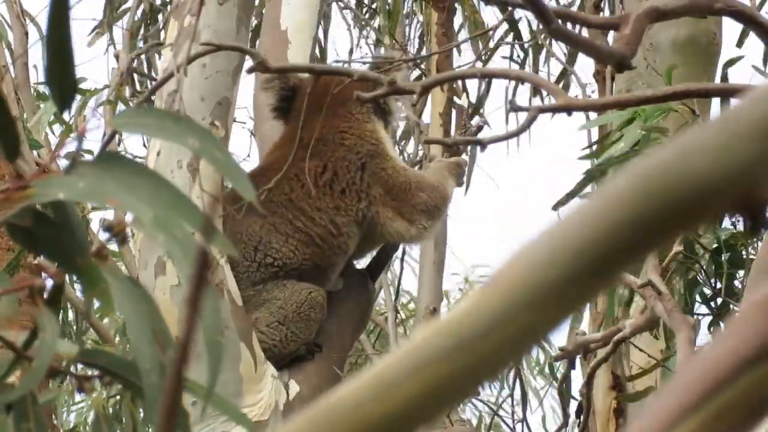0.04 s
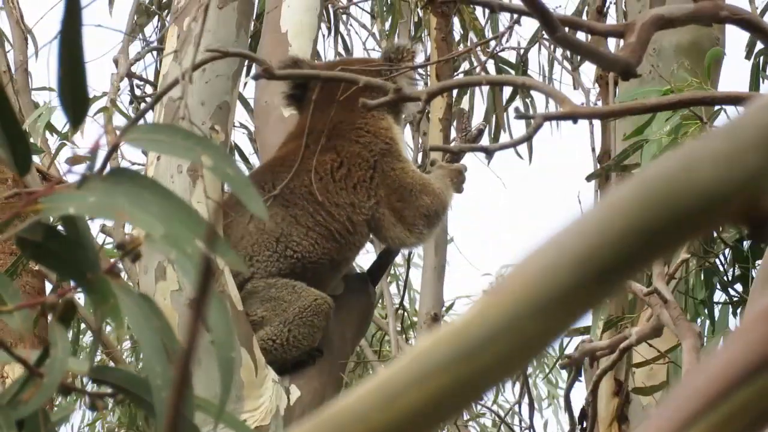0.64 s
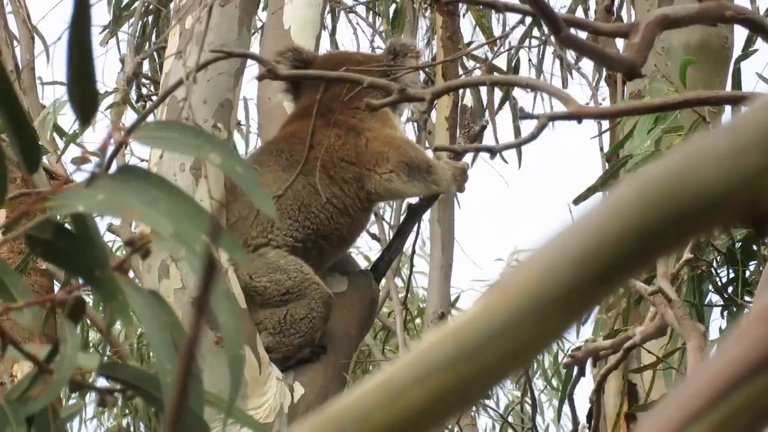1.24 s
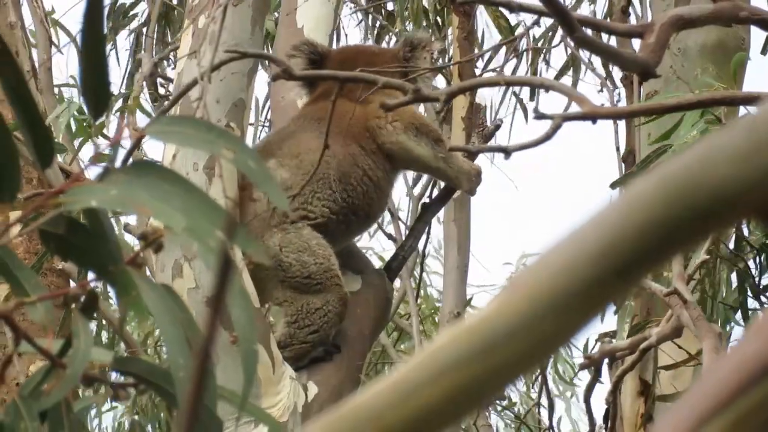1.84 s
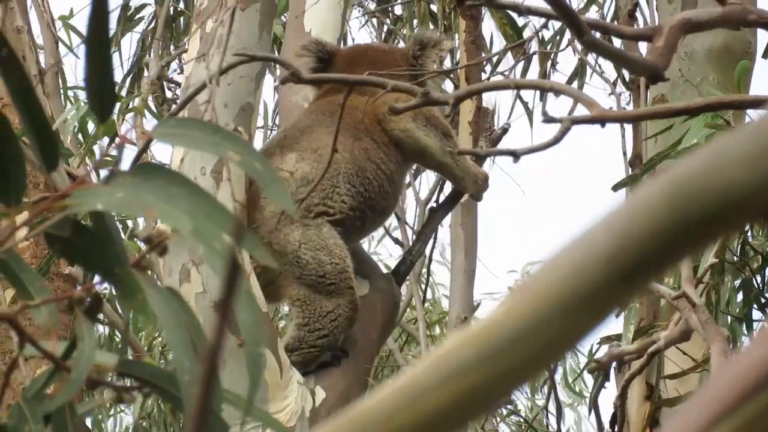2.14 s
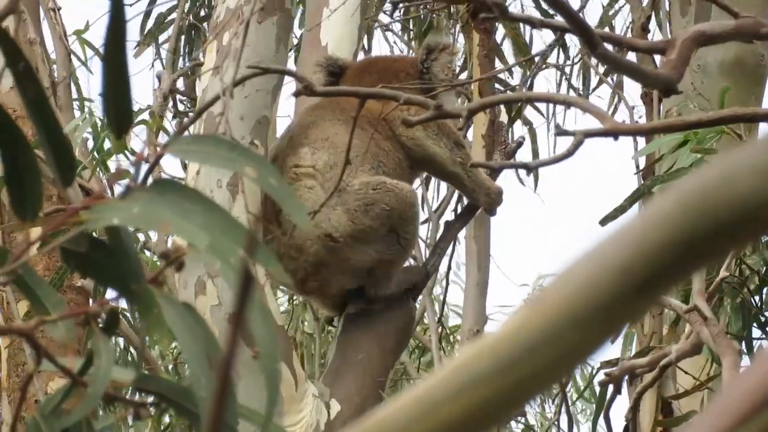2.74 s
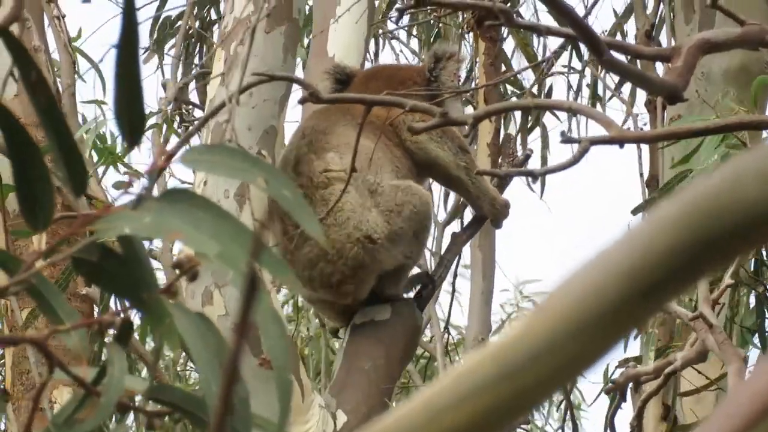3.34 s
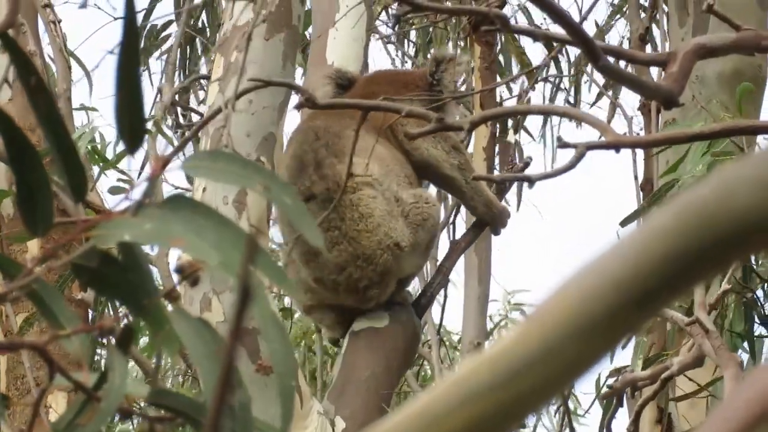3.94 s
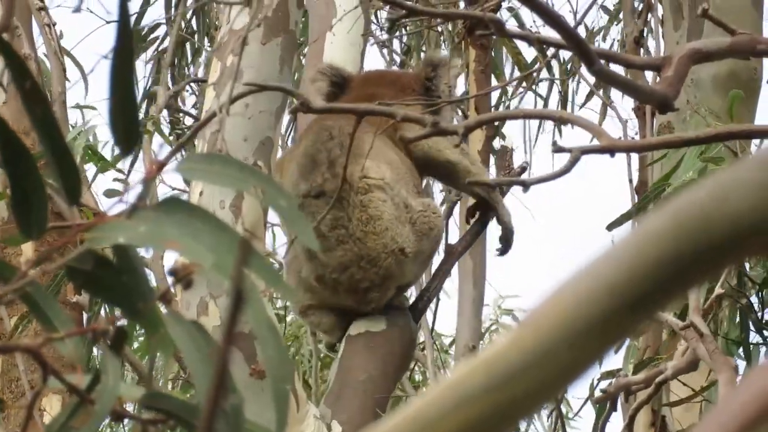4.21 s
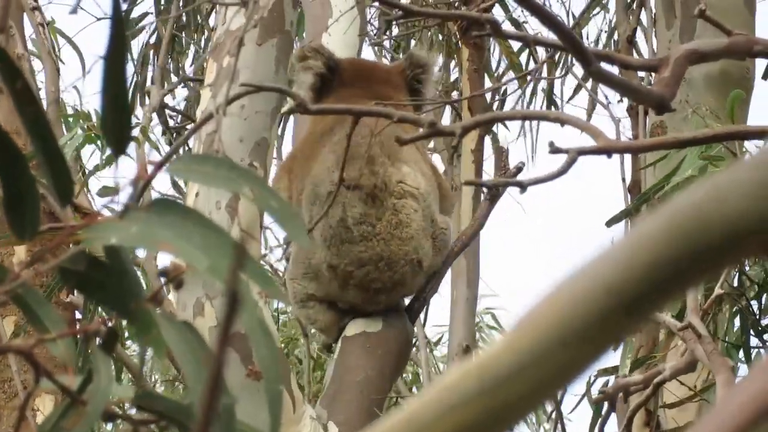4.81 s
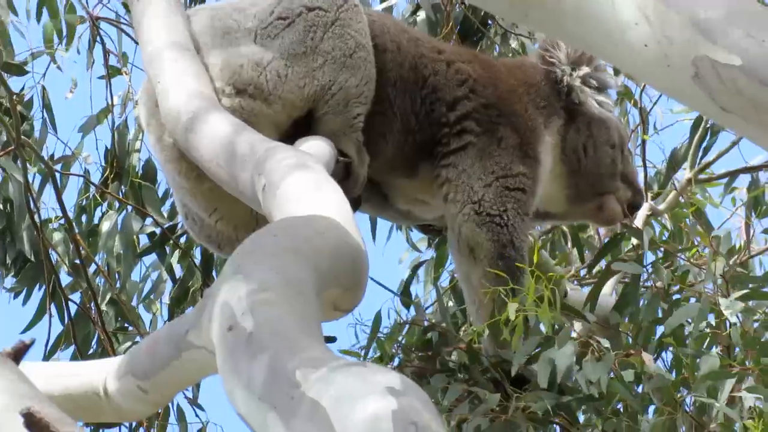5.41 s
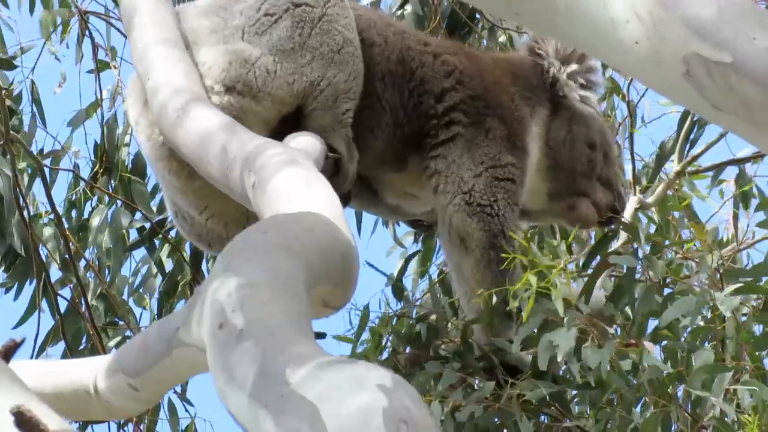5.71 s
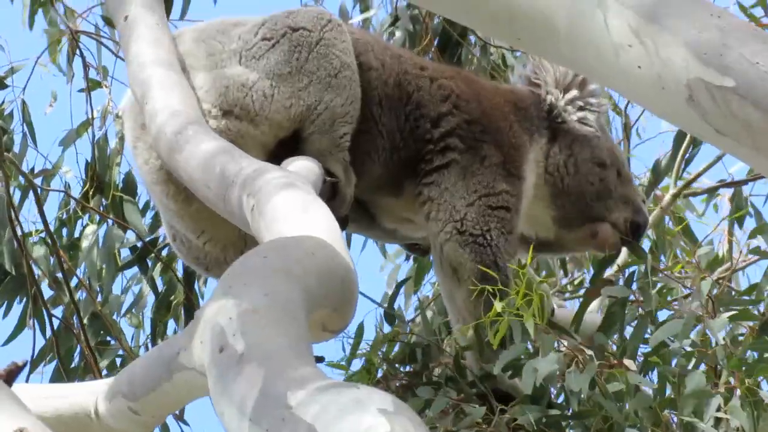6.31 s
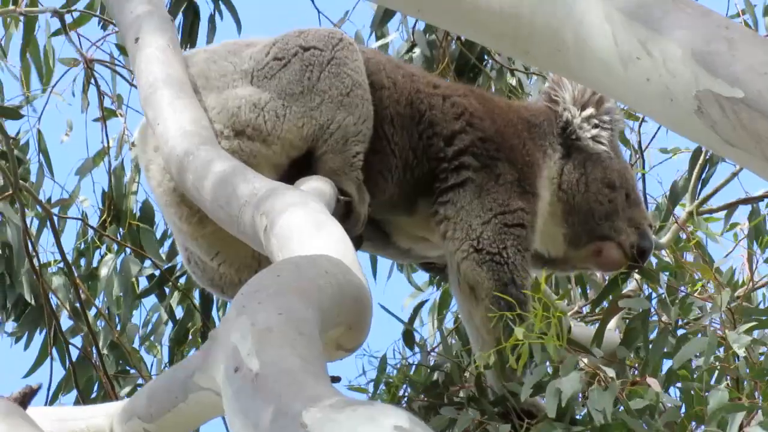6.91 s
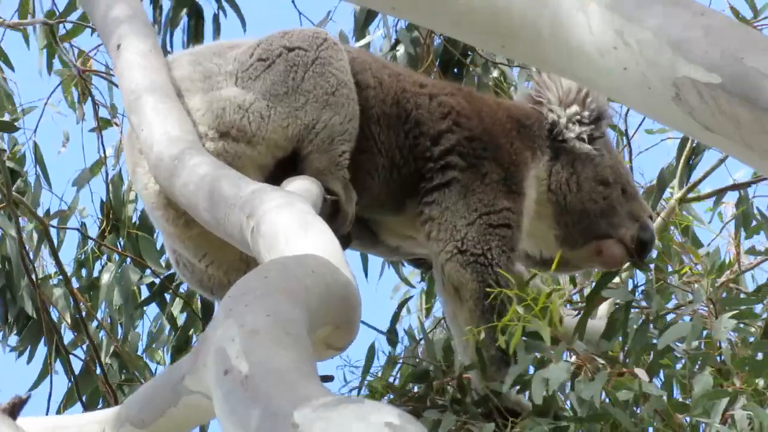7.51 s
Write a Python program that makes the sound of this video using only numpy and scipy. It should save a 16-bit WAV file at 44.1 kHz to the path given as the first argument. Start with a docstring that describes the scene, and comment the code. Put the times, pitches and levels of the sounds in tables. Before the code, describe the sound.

Small birds whistle and chirp over a faint hum, as a close wattlebird gives raspy croaks and yelps and a raven caws far off.

```python
"""A faint hum, the hiss of leaves and the brief whir of a camera's lens motor, which returns at the end.
Far off in open eucalypt woodland, small birds whistle, pipe and chirp in nearly pure tones, and a
raven caws, its buzzing voice shaped by throat resonances. Then a wattlebird close by yelps, croaks,
growls and whips out falling notes, its voice passing from periodic vibration into chaotic rasp.
Trunks and leaves scatter every call."""
import sys
import numpy as np
from scipy import signal
from scipy.fft import rfft, irfft
from scipy.io import wavfile
from scipy.ndimage import map_coordinates

SR = 44100
rng = np.random.default_rng(int(sys.argv[2]) if len(sys.argv) > 2 else 0)


def wrap_up_sound(samples):
    """Save the sound to the file named by the first command line argument, as 16-bit audio."""
    columns = np.atleast_2d(samples).T
    # keep every value between -1 and 1, then stretch to whole-number steps
    tamed = np.clip(columns, -1, 1)
    steps = np.round(tamed * 32767).astype(np.int16)
    wavfile.write(sys.argv[1], SR, steps)


N = 341775
TIME = np.arange(N) / SR
FREQS = np.fft.rfftfreq(N, 1 / SR)
ALONG = np.linspace(0, 1, 33)   # fraction of a note's length
NO_FIFTH_DB = -70   # makes the overtone a fifth above inaudible

# wattlebird growls: start t/s, length/s, swell/s, first f/Hz, last f/Hz, level/dB, fade/(dB/s),
# roughness, beak ring f/Hz
GROWL_NOTES = [(2.916, 0.041, 0.019, 1329, 1458, -27, 188, 0.28, 3950),
               (2.974, 0.13, 0.032, 1225, 1340, -29.5, 217, 0.38, 4474),
               (3.966, .042, 0.0086, 1565, 1279, -21.5, 340, 0.26, 3900),
               (4.027, 0.096, 0.069, 1196, 1433, -28, 78, 0.34, 4095),
               (4.669, 0.057, 0.022, 1348, 1494, -27, 256, 0.7, 4180),
               (4.737, 0.033, .012, 1337, 1410, -22.5, -28, 0.07, 4340),
               (4.775, 0.054, 0.013, 1241, 1369, -29, 97, 0.53, 4144)]
# its whips: start t/s, length/s, rise/s, top f/Hz, time stretch, lingering/s, mean roughness, level/dB,
# opening clack level/dB
WHIP_NOTES = [(3.468, .107, 0.017, 2990, 1.1, 0.026, 0.12, -18.5, -45),
              (3.655, 0.1, .012, 3080, 1.04, 0.0018, 0.2, -18, -23),
              (4.194, .092, .015, 2936, 1.0, 0.0016, 0.2, -18, -29.5),
              (4.358, 0.13, 0.011, 3036, .86, 0.00036, 0.2, -17, -26)]
# throat resonances in croaks and yelps: f/Hz, bandwidth/Hz, level/dB
CROAK_FORMANTS = [(1320, 580, 6.5), (2036, 780, 10), (2960, 400, 2), (3770, 1300, 0.5), (5500, 170, -22.5),
                  (7460, 600, -23)]
# throat resonances in growls and whips: f/Hz, bandwidth/Hz, level/dB
GROWL_FORMANTS = [(1186, 150, -7.5), (1560, 380, 0), (2360, 500, -20.5), (4100, 1300, -18.5),
                  (6760, 600, -37.5)]


def from_db(db):
    """Amplitude grows tenfold for every 20 dB."""
    return 10 ** (np.asarray(db) / 20)


def rms_one(x):
    """Normalisation to unit mean power."""
    return x / np.sqrt(np.mean(x ** 2) + 1e-20)


def at_hz(points, hz):
    """Frequency response: gain interpolated from rows of (f/Hz, level/dB) on logarithmic axes."""
    f, db = np.transpose(points)
    return from_db(np.interp(np.log(hz + 1), np.log(f), db))


def filtered(x, spectrum):
    """Linear filtering multiplies a spectrum by a frequency response."""
    return irfft(rfft(x) * at_hz(spectrum, FREQS), N)


def coloured(spectrum):
    """Filtered white noise takes on the filter's spectrum; unit rms."""
    return rms_one(filtered(rng.standard_normal(N), spectrum))


def drift(rate_hz):
    """Low-pass noise gives a smooth random fluctuation of unit rms."""
    white = rng.standard_normal(len(FREQS)) + 1j * rng.standard_normal(len(FREQS))
    return rms_one(irfft(white / (1 + (FREQS / rate_hz) ** 4), N))


def tone(hz, partials=((1, 0),)):
    """Phase is the integral of frequency; period doubling allows partials at half multiples."""
    phase = 2 * np.pi * np.cumsum(hz) / SR
    return np.sqrt(2) * sum(from_db(db) * np.sin(k * phase) for k, db in partials)


def note(*columns):
    """A note as a trajectory: rows of (t/s, f/Hz, level/dB, ...) from curves and constants."""
    return np.column_stack(np.broadcast_arrays(*columns))


def swell(depth_db):
    """A parabolic envelope in dB, highest at mid-note."""
    return -depth_db * (2 * ALONG - 1) ** 2


def glide(first_hz, last_hz):
    """An exponential sweep covers equal intervals in equal times."""
    return first_hz * (last_hz / first_hz) ** ALONG


def gesture(rows, edge_s=.003):
    """Tapered edges prevent clicks: returns a note's samples, its gate and its control curves."""
    times, *columns = np.transpose(rows)
    times = np.sort(times)
    at = np.arange(max(int((times[0] - edge_s) * SR), 0), min(int((times[-1] + edge_s) * SR), N))
    t = at / SR
    inside_s = np.minimum(t - times[0], times[-1] - t)
    gate = np.sin(np.pi / 2 * np.clip(inside_s / edge_s + 1, 0, 1)) ** 2
    return at, gate, [np.interp(t, times, column) for column in columns]


def woodland(x, near_db, near_t60, far_db, far_t60):
    """Scattering adds sparse echoes from nearby trunks and a duller tail from the wood (T60 in s)."""
    t = TIME[:SR]
    trunks = rng.standard_normal(SR) * (rng.random(SR) < 1200 / SR)   # 1200 echoes a second
    trunks *= from_db(-60 * t / near_t60) * (t > .005)
    wood = signal.sosfilt(signal.butter(1, 3000, fs=SR, output="sos"), rng.standard_normal(SR))
    wood *= from_db(-60 * t / far_t60) * np.minimum(t / .042, 1)
    echoes = (from_db(near_db) * rms_one(trunks) + from_db(far_db) * rms_one(wood)) / np.sqrt(SR)
    return x + signal.fftconvolve(x, echoes)[:N]


def background():
    """Broadband noise of air and leaves lies over a hum of two frequency-modulated tones."""
    air_spectrum = [(90, 1), (170, -3.5), (800, -4), (1200, -4.5), (1800, -16.5), (2800, -31),
                    (5000, -37.5), (15000, -35.5)]   # still air: f/Hz, relative level/dB
    leaf_spectrum = [(1000, 0), (2000, 1.5), (4000, -5.5), (7000, -10), (15000, -19.5)]   # hiss of leaves: f/Hz, relative level/dB
    leaf_levels = [(0, -69.5), (.11, -68.5), (.16, -75), (1.4, -74.5), (3.5, -66.5), (7.585, -68),
                   (7.6, -72)]   # its envelope: t/s, level/dB
    hum_levels = [(0, -66), (.65, -76.5), (1.5, -66), (2.1, -64), (3.1, -65), (4.3, -83.5), (5.1, -70.5),
                  (6.1, -65.5), (7.75, -77)]   # envelope of the upper tone: t/s, level/dB
    low_hum = from_db(-68.5 + .89 * drift(5)) * tone(75 + 4.8 * drift(4.5))
    high_hum = from_db(np.interp(TIME, *np.transpose(hum_levels))) * tone(129.2 + 1.1 * drift(3.3))
    leaves = from_db(np.interp(TIME, *np.transpose(leaf_levels))) * coloured(leaf_spectrum)
    return from_db(-64) * coloured(air_spectrum) + leaves + low_hum + high_hum


def ticks(t60_s=.018, width_s=.0027):
    """Brief scuffs excite the damped modes of the camera body."""
    scuffs = [(1.421, -66.5), (7.241, -45)]   # contacts with the body: t/s, level/dB
    modes = [(2350, 3), (6950, 3), (8150, -5.5)]   # its resonances: f/Hz, relative level/dB
    t = TIME[:SR // 10]
    body = sum(from_db(db - 60 * t / t60_s) * np.sin(2 * np.pi * hz * t) for hz, db in modes)
    envelope = sum(from_db(db) * np.exp(-np.minimum(((TIME - s) / width_s) ** 2, 400))
                   for s, db in scuffs)
    return signal.fftconvolve(envelope * rng.standard_normal(N), body / np.linalg.norm(body))[:N]


def camera(whine_hz=11810, whine_db=-89):
    """The lens motor radiates a high band of noise, beside body ticks and a thin electronic whine."""
    motor_runs = [(0.12, 0.77, -69.5), (7.591, 7.703, -69)]   # whirs: start t/s, end t/s, level/dB
    motor_spectrum = [(4500, -53), (7000, -11), (11100, -5.5), (11700, 7), (12150, 7.5), (12800, -10),
                      (13600, -22)]   # motor noise: f/Hz, relative level/dB
    running = sum(from_db(db) * np.clip(np.minimum(TIME - start, end - TIME) / .006, 0, 1)
                  for start, end, db in motor_runs)
    whine = from_db(whine_db) * tone(whine_hz + 35 * drift(60))
    return running * coloured(motor_spectrum) + ticks() + whine


def raven(gape_db=11, gape_half_width_hz=150, break_off_s=7.59):
    """Source and filter: harmonics slide down through a resonance that climbs as the beak opens."""
    # caws: start t/s, length/s, f/Hz, level/dB, tilt from the open beak/(dB/octave), throat tuning ratio
    caws = [(0.771, 0.43, 261.2, -66, -14, 0.95), (1.424, 0.44, 272, -61, 5, 0.96),
            (4.628, 0.44, 255, -54, -21.5, 1.01), (5.398, 0.45, 255.6, -50.5, 8.5, 1.022),
            (6.343, 0.46, 249.8, -51.5, 6, 1.012), (7.204, 0.42, 254, -58.5, 8.5, 1.06)]
    contour = [(0, .91, -20, 2.5), (.16, .985, -2, 1.8), (.3, 1, 0, .5), (.5, .985, 0, .5),
               (.66, .945, 0, .6), (.82, .885, 0, .8), (1, .8, -7, 2)]   # one caw: fraction of its length, pitch ratio, level/dB, hoarseness
    throat = [(1200, -24.5), (1550, 12.5), (1800, 1), (2050, 6.5), (2500, -5), (2800, -51), (3300, -16),
              (3600, -13), (3900, -49)]   # throat response: f/Hz, level/dB
    out, tremble = np.zeros(N), .0129 * drift(150)
    for start, length, pitch_hz, level_db, tilt, tuning in caws:
        rows = np.array(contour) * [length, pitch_hz, 1, 1] + [start, 0, level_db, 0]
        at, gate, (hz, db, hoarse) = gesture(rows, edge_s=.015)
        phase = 2 * np.pi * np.cumsum(hz * (1 + hoarse * tremble[at])) / SR
        gape_hz, buzz = np.linspace(2130, 2400, len(at)), 0
        for k in range(4, 19):
            scaled_hz = k * hz / tuning
            lift_db = gape_db / (1 + ((scaled_hz - gape_hz) / gape_half_width_hz) ** 2)
            gain = at_hz(throat, scaled_hz) * from_db(lift_db + tilt * np.log2(k))
            buzz += gain * np.sin(k * phase + rng.uniform(0, 2 * np.pi))
        out[at] += gate * from_db(db) * rms_one(buzz)
    break_off = np.clip((break_off_s - TIME) / .003, 0, 1)   # the last caw stops short, echoes and all
    return break_off * woodland(out, near_db=-8, near_t60=.15, far_db=-17, far_t60=.3)


def whistled(notes, waver, waver_hz, edge_s):
    """Sinusoidal notes tremble in pitch by random frequency modulation of relative depth waver."""
    out, tremble = np.zeros(N), waver * drift(waver_hz)
    for rows in notes:
        at, gate, (hz, db) = gesture(rows, edge_s)
        out[at] += gate * from_db(db) * tone(hz * (1 + tremble[at]))
    return out


def far_whistlers(fade_db=9):
    """Nearly pure tones swell and fade on gentle linear sweeps, blurred by scattering."""
    whistles = [(0.018, 0.078, 2910, 3030, -69.5), (0.26, 0.18, 1396, 1380, -62),
                (.584, 0.093, 1460, 1656, -54), (.63, 0.079, 1217, 1194, -59),
                (1.352, 0.053, 1119, 1083, -53.5), (1.608, 0.14, 1178, 1013, -56),
                (1.64, .11, 3010, 3220, -69), (1.789, 0.082, 4200, 4080, -65.5),
                (1.964, .015, 1644, 1605, -54.5), (2.479, .072, 1946, 1747, -52.5),
                (2.66, 0.19, 1174, 1100, -54), (3.211, 0.091, 2947, 3040, -50.5),
                (3.221, 0.068, 1652, 1413, -51), (3.373, 0.062, 1752, 1550, -43.5),
                (3.534, 0.071, 4500, 4410, -52.5), (5.004, 0.031, 1147, 1066, -49),
                (5.083, 0.068, 2947, 2970, -50), (5.189, 0.16, 1667, 1605, -65),
                (5.804, 0.099, 1016, 1054, -49), (6.021, 0.018, 1100, 1033, -49.5),
                (6.228, 0.035, 1220, 1423, -52.5), (6.33, 0.065, 1598, 1580, -53.5),
                (6.484, 0.044, 1000, 1060, -53.5), (6.58, 0.11, 1160, 1156, -49.5),
                (7.16, .06, 855, 754, -59.5), (7.291, .14, 3100, 2980, -61)]   # fluting notes: start t/s, length/s, first f/Hz, last f/Hz, level/dB
    envelope_db = np.array([-fade_db, 0, 0, -fade_db])
    notes = [note(np.linspace(start, start + length, 4), np.linspace(first, last, 4), db + envelope_db)
             for start, length, first, last, db in whistles]
    direct = whistled(notes, waver=.0073, waver_hz=50, edge_s=.013)
    return woodland(direct, near_db=-12, near_t60=.18, far_db=-11.5, far_t60=.29)


def arch(row, swell_db, roundness):
    """A chirp's pitch follows two power-law sweeps that meet at a turn."""
    start, before, after, first, turn, last, db = row
    t = ALONG * (before + after) - before
    from_turn = np.abs(t / np.where(t < 0, before, after))
    hz = turn + np.where(t < 0, first - turn, last - turn) * from_turn ** roundness
    return note(start + before + t, hz, db + swell(swell_db))


def small_birds(flutter_db=5, flutter_hz=70):
    """Frequency and amplitude modulation of pure tones gives chirps, a slur, twitters and piping."""
    # thin chirps: start t/s, time to the turn/s, time after it/s, first, turn and last f/Hz, level/dB
    chirp_rows = [(.418, 0.025, 0.048, 6690, 6610, 6450, -45.5),
                  (2.016, 0.07, 0.034, 4470, 4560, 4760, -45),
                  (3.501, 0.0087, 0.076, 6000, 6900, 5950, -41.5),
                  (3.806, .055, 0.057, 5150, 5910, 6400, -50.5),
                  (5.422, .0087, 0.042, 5900, 7060, 5470, -48)]
    twitter_rows = [(1.761, .05, 0.051, 4600, 6400, 5730, -65),
                    (4.013, 0.016, 0.025, 6200, 6940, 5440, -44.5),
                    (6.08, 0.032, .012, 5900, 7540, 5900, -50), (6.196, 0.04, 0.036, 6250, 7700, 5760, -42),
                    (6.212, .017, 0.02, 7700, 8550, 7650, -58.5),
                    (6.42, 0.032, 0.019, 5800, 7640, 6100, -47.5),
                    (6.875, 0.023, 0.02, 5900, 6910, 6200, -56)]   # buzzier, warbling notes: same columns
    twitter_throat = [(6200, -1), (6650, 3.5), (7100, -1.5), (8600, -1.5)]   # throat response: f/Hz, level/dB
    slur_contour = [(5.889, 4890, -72), (5.912, 4926, -39.5), (5.923, 5230, -42), (5.936, 6600, -54),
                    (5.95, 6700, -68), (5.966, 7000, -36.5), (5.988, 7380, -68), (6.002, 7090, -35.5),
                    (6.026, 6880, -45.5), (6.06, 6900, -40.5)]   # a whistle that leaps and sinks back: t/s, f/Hz, level/dB
    pip_runs = [(1.042, -59), (1.179, -61), (1.326, -58), (1.467, -57.5), (1.615, -57.5), (6.319, -57.5),
                (6.451, -54), (6.585, -54), (6.727, -53.5), (6.862, -54), (7.004, -55.5), (7.179, -57.5)]   # two runs of piping: t/s, level/dB
    pip_contour = [(-.02, 2017, -16.5), (-.006, 1886, 5.5), (.004, 1720, 10.5), (0.02, 1360, -17)]   # one falling pip: t/s from its centre, f/Hz, relative level/dB
    chirp_notes = [arch(row, swell_db=22.5, roundness=1.1) for row in chirp_rows]
    twitter_notes = [arch(row, swell_db=13, roundness=1.6) for row in twitter_rows]
    pip_notes = [np.array(pip_contour) + [s, 0, db] for s, db in pip_runs]
    chirps = whistled(chirp_notes, waver=.0031, waver_hz=199, edge_s=.0053)
    slur = whistled([slur_contour], waver=.0033, waver_hz=150, edge_s=.004)
    twitters = filtered(whistled(twitter_notes, waver=.016, waver_hz=130, edge_s=.0019), twitter_throat)
    flutter = from_db(flutter_db * drift(flutter_hz))
    pips = whistled(pip_notes, waver=.0098, waver_hz=41.2, edge_s=.008)
    return (woodland(flutter * chirps + slur, near_db=-8, near_t60=.25, far_db=-16, far_t60=.39)
            + woodland(flutter * twitters, near_db=-1, near_t60=.34, far_db=-19, far_t60=.92)
            + woodland(pips, near_db=-10, near_t60=.019, far_db=-17, far_t60=.68))


def rasp(formants):
    """Chaotic, fluttering airflow excites the resonances of the throat."""
    flow = rng.standard_normal(N) * from_db(2 * drift(130))
    out = 0
    for hz, width, db in formants:
        band = signal.butter(3, [hz - width / 2, hz + width / 2], "band", fs=SR, output="sos")
        out += from_db(db) * signal.sosfilt(band, flow)
    return rms_one(out)


def rough_voice(notes, partials, formants, jitter, jitter_hz, rasp_share, tunings=None):
    """Aperiodic vibration: with roughness, pitch jitters, level shimmers and tone gives way to rasp."""
    out, shake, shimmer = np.zeros(N), jitter * drift(jitter_hz), .3 * drift(jitter_hz)
    noise = rasp(formants)
    wander = 1 + .045 * drift(30)   # the resonances shift as the throat works
    for rows, tuning in zip(notes, tunings or np.ones(len(notes))):
        at, gate, (hz, db, rough, fifth_db) = gesture(rows)
        share = np.clip(rasp_share * rough, 0, 1)
        voiced = tone(hz * (1 + rough * shake[at]), [*partials, (1.5, fifth_db)])
        voiced *= 1 + rough * shimmer[at]
        # resampling the noise scales all its resonances together
        rasping = map_coordinates(noise[at[0]:at[0] + 2 * len(at)], [np.cumsum(tuning * wander[at])])
        out[at] += gate * from_db(db) * (np.sqrt(1 - share ** 2) * voiced + share * rasping)
    return out


def croaks(clean_rough=.046, clean_fifth_db=-19.5, break_s=.0042, rasp_rough=.98, sag_oct_per_s=3.5):
    """A voice break: a clean tone climbs and swells, then jumps down into a sinking, chaotic rasp."""
    # croaks: start t/s, clean length/s, rasp length/s, first, break and rasp f/Hz, tone level/dB,
    # rasp level/dB, relative level of the fifth above/dB, throat tuning ratio
    calls = [(2.586, 0.011, .034, 1816, 2312, 1562, -22, -28.5, -6, 1.04),
             (2.822, .011, 0.053, 2125, 2220, 1977, -22.5, -26, -2, 0.99),
             (3.884, .017, 0.035, 2010, 2187, 1897, -21, -25.5, 0.5, .96),
             (4.585, 0.0086, 0.048, 2075, 2387, 1898, -29, -26, 1.5, 0.98)]
    partials = [(.5, -15), (1, 0), (2, -31)]   # voice spectrum: frequency ratio, level/dB
    notes, tunings = [], []
    for start, clean_s, rasp_s, first, top, rasp_hz, tone_db, rasp_db, fifth_db, tuning in calls:
        rising_db = tone_db - 9.5 * (1 - ALONG) ** 2
        clean = note(start + clean_s * ALONG, glide(first, top), rising_db, clean_rough, clean_fifth_db)
        t = rasp_s * ALONG
        sinking_hz = rasp_hz * 2 ** (-sag_oct_per_s * t)
        broken = note(start + clean_s + break_s + t, sinking_hz, rasp_db + swell(3.5),
                      rasp_rough, fifth_db)
        notes.append(np.vstack([clean, broken]))
        tunings.append(tuning)
    return rough_voice(notes, partials, CROAK_FORMANTS, jitter=.045, jitter_hz=250, rasp_share=.64,
                       tunings=tunings)


def yelps(clack_s=.009, clack_hz=(2650, 3080), clack_fifth_db=-6, clack_rough=.45):
    """Short sweeps with period doubling: hoarse yelps, and the throat clack that opens each whip."""
    # yelps: start t/s, length/s, first and last f/Hz, level/dB, relative level of the fifth/dB, roughness
    calls = [(2.175, 0.022, 1920, 1798, -29.5, -2.5, 0), (2.195, 0.023, 1730, 1360, -32.5, -27, 0.08),
             (2.207, 0.015, 2350, 1910, -30, -19.5, 0.16), (2.402, 0.02, 2144, 1890, -28.5, -23, 0.1),
             (2.425, 0.018, 1875, 1770, -29, -24, 0), (3.358, 0.021, 2550, 2270, -34, -47, 0.18)]
    partials = [(.5, -36.5), (1, 2), (2, -25.5)]   # voice spectrum: frequency ratio, level/dB
    clacks = [(start - clack_s, clack_s, *clack_hz, db, clack_fifth_db, clack_rough)
              for start, *_, db in WHIP_NOTES]
    notes = [note(start + length * ALONG, glide(first, last), db + swell(9), rough, fifth_db)
             for start, length, first, last, db, fifth_db, rough in calls + clacks]
    return rough_voice(notes, partials, CROAK_FORMANTS, jitter=.2, jitter_hz=255, rasp_share=.37)


def growls(throb_hz=140, throb_scatter=.2, attack_db=2):
    """Uneven amplitude modulation makes low glides throb, more deeply the rougher they are."""
    partials = [(1, -0.5), (2, -31.5), (3, -30)]   # voice spectrum: harmonic number, level/dB
    notes = []
    for start, length, swell_s, first, last, db, fade_db_per_s, rough, _ in GROWL_NOTES:
        t = np.arange(0, length, 20 / SR)
        pulse_times = np.cumsum(1 + throb_scatter * rng.standard_normal(len(ALONG))) / throb_hz
        cycles = np.interp(t, pulse_times - pulse_times[0], np.arange(len(pulse_times)))
        throb_db = 4.5 * rough * (np.cos(2 * np.pi * cycles) - .5)
        rise_db = -attack_db * np.maximum(1 - t / swell_s, 0)
        fade_db = -fade_db_per_s * np.maximum(t - swell_s, 0)
        hz = first * (last / first) ** (t / length)
        notes.append(note(start + t, hz, db + rise_db + fade_db + throb_db, rough, NO_FIFTH_DB))
    return rough_voice(notes, partials, GROWL_FORMANTS, jitter=.12, jitter_hz=130, rasp_share=1)


def beak_rings(ring_db=-47.5, fade_share=.33):
    """A beak resonance rings as a narrow high band over each growl, following part of its fade."""
    notes = []
    for start, length, *_, fade_db_per_s, _, ring_hz in GROWL_NOTES:
        t = length * ALONG
        notes.append(note(start + t, ring_hz, ring_db - fade_share * fade_db_per_s * t))
    return whistled(notes, waver=.025, waver_hz=300, edge_s=.0056) * drift(240)


def whips():
    """A fast frequency sweep arches cleanly over its top and roughens on the way down."""
    contour = [(-.016, .91, -2, 0), (-.007, 1, -3, 0.16), (0, 1, 1, 0.13), (.008, .93, -1.5, 0),
               (.02, .71, 2.5, 0.26), (.028, .565, 0.5, 1), (0.039, .45, -10.5, 0.87),
               (.058, .38, -16, 0.84), (0.074, .29, -25, 1)]   # one whip: t/s from its top, pitch ratio, level/dB, fraction of lingering
    partials = [(1, 0), (2, -48), (3, -53)]   # voice spectrum: harmonic number, level/dB
    from_top_s, ratio, shape_db, lingered = np.transpose(contour)
    notes = []
    for start, length, rise_s, top_hz, stretch, linger_s, rough, db, _ in WHIP_NOTES:
        times = rise_s + stretch * from_top_s + linger_s * lingered
        t = length * ALONG
        hz = top_hz * np.interp(t, times, ratio)
        level_db = db + np.interp(t, times, shape_db)
        notes.append(note(start + t, hz, level_db, 2 * rough * ALONG, NO_FIFTH_DB))
    return rough_voice(notes, partials, GROWL_FORMANTS, jitter=.029, jitter_hz=220, rasp_share=.29)


def off_ground(x, delay_s=.00236, bounce_db=-13):
    """Comb filtering: a reflection off the ground interferes with the direct sound, so glides throb."""
    return x + from_db(bounce_db) * np.interp(TIME - delay_s, TIME, x)


def wattlebird():
    """Source and filter: one windpipe and beak colour all calls; harsh ones scatter more than whips."""
    beak = [(750, -42.5), (1100, -2), (3030, -6), (3300, -7.5), (3650, 1.5), (4500, -7.5), (5300, -5),
            (5800, 3.5), (6400, -4), (8200, -4.5), (8850, 8.5), (9500, -16)]   # response of windpipe and beak: f/Hz, level/dB
    harsh = off_ground(filtered(croaks() + yelps() + growls(), beak))
    rings = filtered(beak_rings(), beak)
    clear = off_ground(filtered(whips(), beak))
    return (woodland(harsh, near_db=-3, near_t60=.3, far_db=-21, far_t60=.97)
            + woodland(clear, near_db=-8.5, near_t60=.35, far_db=-28, far_t60=1)
            + woodland(rings, near_db=1, near_t60=.43, far_db=-18, far_t60=.8))


def scene():
    """Superposition: the pressures of all sources add at one microphone."""
    return (wattlebird() + small_birds() + far_whistlers() + raven() + background() + camera())[None]


def record(dry):
    """A steep low-pass filter removes the treble above 15.7 kHz."""
    return signal.sosfilt(signal.ellip(10, .1, 70, 15700, fs=SR, output="sos"), dry)


dry = scene()
out = record(dry)
wrap_up_sound(out)
```